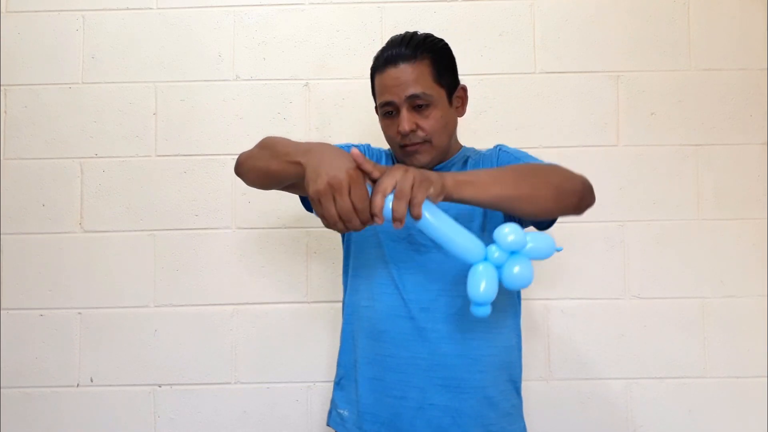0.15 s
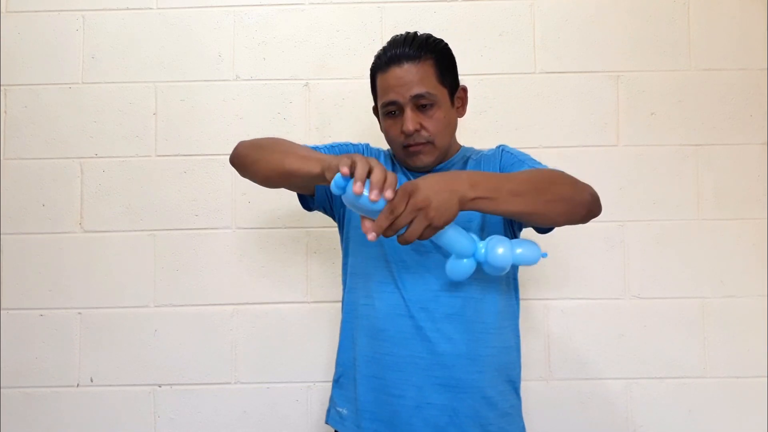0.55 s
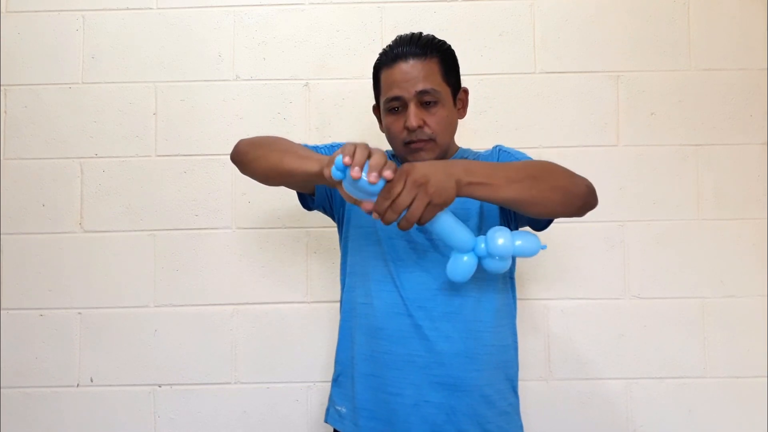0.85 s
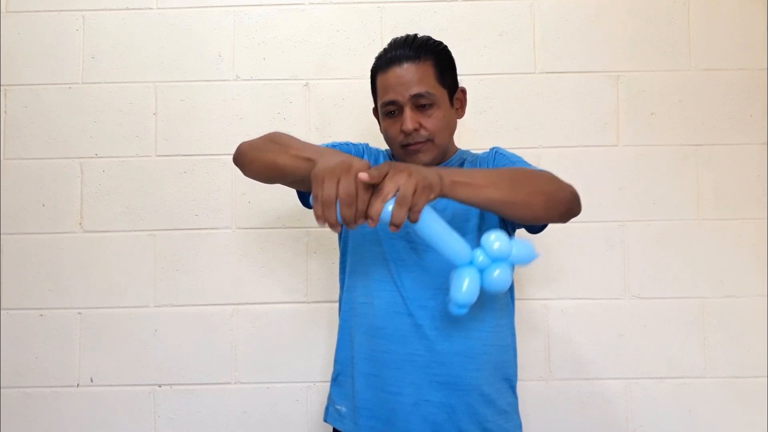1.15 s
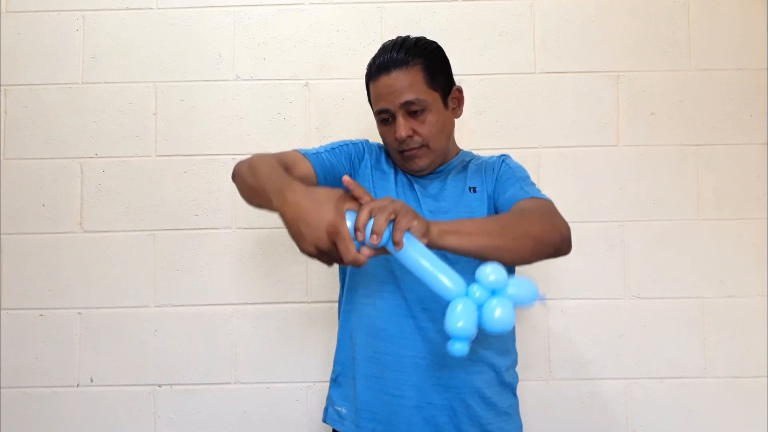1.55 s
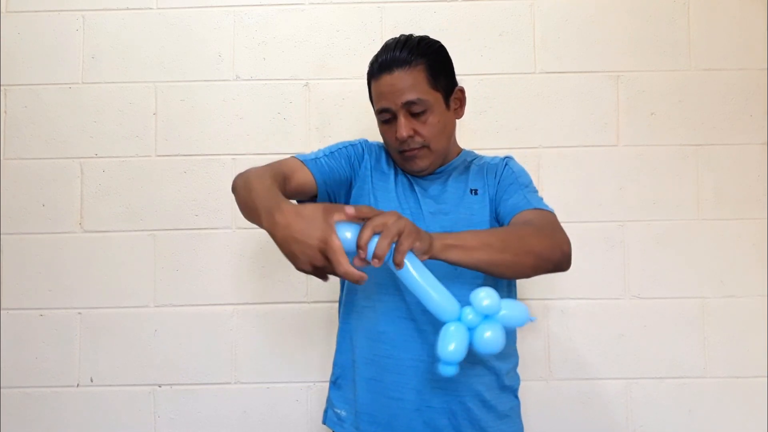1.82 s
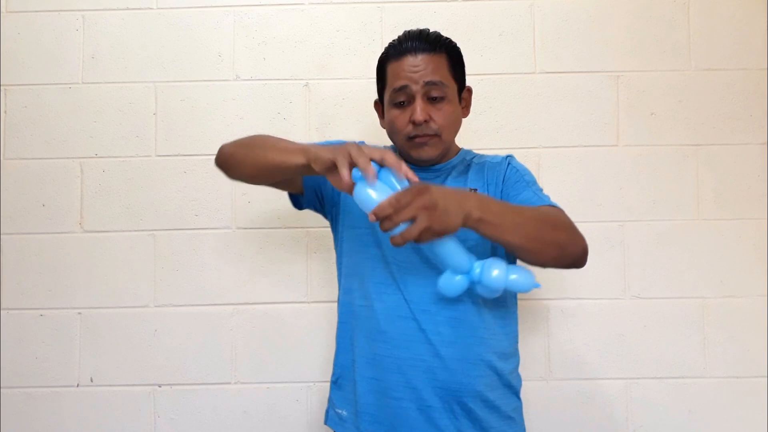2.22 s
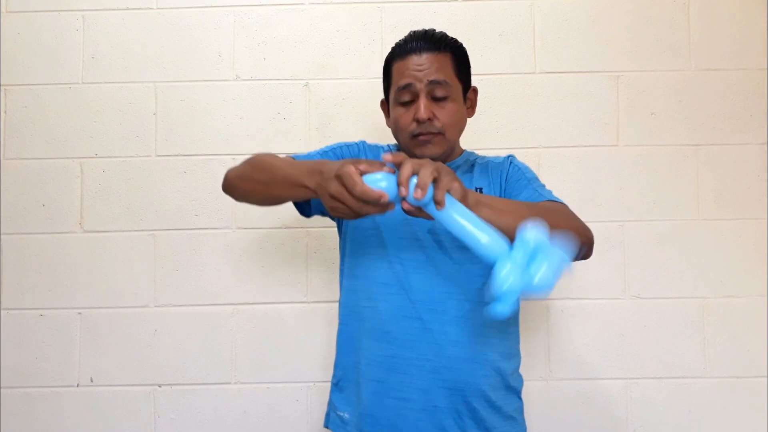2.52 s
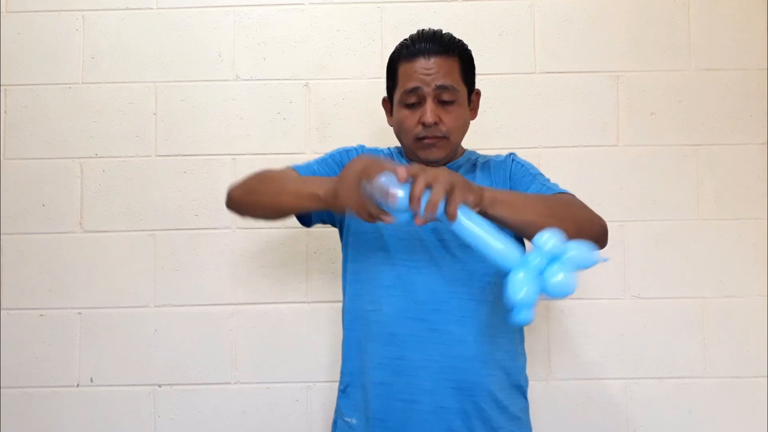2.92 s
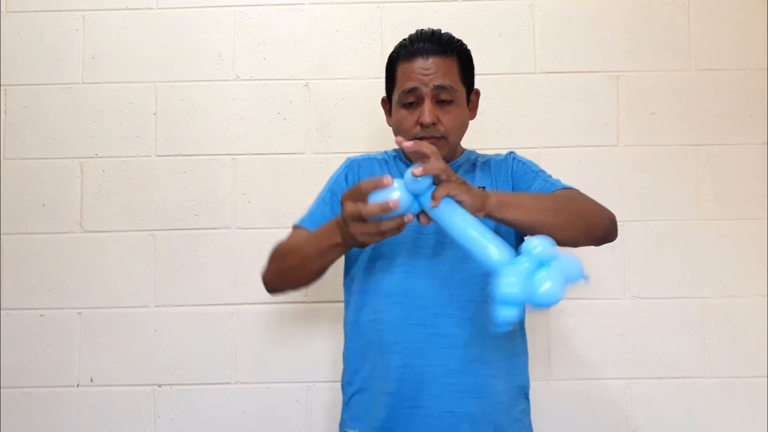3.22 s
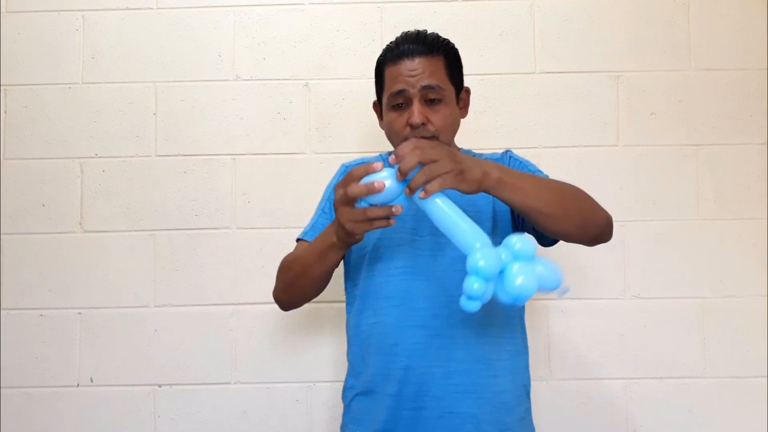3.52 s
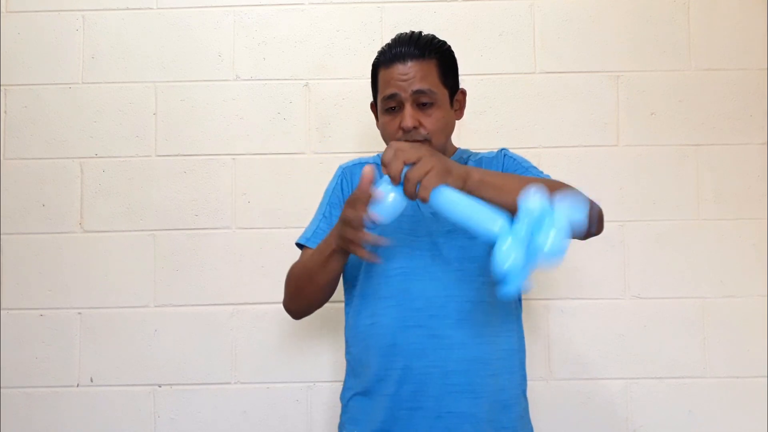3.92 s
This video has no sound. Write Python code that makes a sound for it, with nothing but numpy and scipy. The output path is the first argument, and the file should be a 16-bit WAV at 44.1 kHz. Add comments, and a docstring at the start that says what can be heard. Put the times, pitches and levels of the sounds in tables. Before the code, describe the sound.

A long latex balloon is twisted by hand, heard from a few steps away in a small, hard-walled room. Each burst is very brief, bright and slightly hollow, with a short echo. From the start to about 1.4 seconds come light, irregular creaks and ticks, with a tiny groan at 0.5 and faint chirps near 1.0. A stronger rub hits at 1.5. A loud snap and creaks at 1.8 lead to a short high squeal at 1.9, then a lull. Small snaps and rubs resume around 2.3, growing to a firm creak near 2.9. A sharp, loud snap lands at 3.1 and a short lower squeak at 3.3. More creaks follow around 3.6, thinning to a soft chirp and light ticks by 4 seconds. Faint rubbery crackling fills some gaps, over very quiet, dull, steady room noise.

```python
"""In a small, bare room with hard walls, someone twists and locks a long latex balloon by hand.
The rubber sticks, then slips: one slip snaps, a run of slips creaks and rubs, and now and then
the slips fall into step and squeak. Snaps and rubs ring the tight skin and the air in the
balloon's bubbles. The room draws each burst out, over a faint, dull background noise."""
import sys
import numpy as np
from scipy import signal
from scipy.fft import rfft, irfft
from scipy.io import wavfile
from scipy.ndimage import uniform_filter1d

SR = 44100
rng = np.random.default_rng(int(sys.argv[2]) if len(sys.argv) > 2 else 0)


def master_out(mix):
    """Clip the mix to full scale and print it as 16-bit PCM to the path in sys.argv[1]."""
    frames = np.transpose(np.atleast_2d(mix))
    ceiling = np.clip(frames, -1, 1)
    pcm = np.round(ceiling * 32767).astype(np.int16)
    wavfile.write(sys.argv[1], SR, pcm)


N = 179310


def from_db(db):
    """Turn decibels into a number to multiply by."""
    return 10 ** (np.asarray(db) / 20)


def unit_energy(x):
    """Scale a sound so that its squares add up to one."""
    return x / np.sqrt(np.sum(x ** 2) + 1e-20)


def at_hz(points, hz):
    """Read between the rows of a table, giving every octave equal space."""
    known_hz, values = np.transpose(points)
    return np.interp(np.log(np.maximum(hz, 1)), np.log(known_hz), values)


def add(out, start_s, sound):
    """Mix a sound in at its start time."""
    start = int(np.clip(start_s * SR, 0, N - 1))
    out[start:start + len(sound)] += sound[:N - start]


# The background noise, from bass to treble: frequency_hz, relative_level_db
BACKGROUND_SPECTRUM = [(20, -2), (45, -22.5), (72, 3), (100, -2), (220, -4), (450, -7.5), (650, -6),
                       (1300, -13), (3000, -20), (6000, -27), (16000, -38)]

def background(level_db=-63):
    """Faint, dull, steady room noise."""
    gain = from_db(at_hz(BACKGROUND_SPECTRUM, np.fft.rfftfreq(N, 1 / SR)))
    noise = irfft(rfft(rng.standard_normal(N)) * gain, N)
    return from_db(level_db) * unit_energy(noise) * np.sqrt(N)


# How long the room takes to die away by 60 dB: frequency_hz, fade_s
ROOM_FADE_TIMES = [(150, 0.23), (500, 0.29), (1400, 0.2898), (3500, 0.3), (8000, 0.212), (15000, 0.17)]
# The first bounces off the walls: delay_s, gain (the direct sound is 1)
WALL_ECHOES = [(.0034, 0.44), (.0084, 0.85)]

def room_response(tail_db=4.5, build_s=0.0057):
    """One click in the room: the direct sound, two echoes and a tail whose highest notes die first."""
    t = np.arange(int(.5 * SR)) / SR
    hz, white = np.fft.rfftfreq(len(t), 1 / SR), rfft(rng.standard_normal(len(t)))
    edges_hz = np.geomspace(40, SR / 2, 16)
    tail, build = np.zeros(len(t)), 1 - np.exp(-t / build_s)
    for low, high in zip(edges_hz, edges_hz[1:]):
        band = irfft(white * ((hz >= low) & (hz < high)), len(t))
        fade = np.exp(-np.log(1000) * t / at_hz(ROOM_FADE_TIMES, np.sqrt(low * high)))
        tail += unit_energy(band * fade * build) * np.sqrt(high - low)
    response = from_db(tail_db) * unit_energy(tail)
    response[0] += 1   # the direct sound
    for delay_s, gain in WALL_ECHOES:
        response[int(delay_s * rng.uniform(.9, 1.1) * SR)] += gain
    return unit_energy(response)


def room(x, stretches=90):
    """The balloon keeps moving, so each stretch of its sound gets a new pattern of echoes."""
    out, marks = np.zeros(N), np.linspace(0, N, stretches + 1).astype(int)
    overlap = int(.004 * SR)
    for start, end in zip(marks, marks[1:]):
        stretch = x[start:end + overlap]
        steps = np.arange(len(stretch))
        fade = np.minimum(np.minimum(steps, len(stretch) - steps) / overlap, 1)
        add(out, start / SR, signal.fftconvolve(stretch * fade, room_response()))
    return out


def flutter(slips, decay_s, jolt_db):
    """Each slip is a jolt, then a scatter of waves that run round the balloon for a moment."""
    power = signal.lfilter([1], [1, -np.exp(-2 / (decay_s * SR))], slips ** 2)
    scatter = unit_energy(np.sqrt(power) * rng.standard_normal(len(slips)))
    return scatter + from_db(jolt_db) * unit_energy(slips)


def resonate(x, hz, width_hz):
    """Ring around one pitch; filtering twice shuts out far-off pitches more firmly."""
    half_width = np.tan(np.pi * min(width_hz / SR, .4))
    section = [half_width, 0, -half_width, 1 + half_width, -2 * np.cos(2 * np.pi * hz / SR), 1 - half_width]
    return signal.sosfilt(np.array([section, section]) / (1 + half_width), x + 1e-18)


RING_SAMPLES = 2048   # time allowed for a slip to ring out
SKIN_HZ = 2012   # the skin's ring at a typical tightness

# The crack, from bass to treble: frequency_hz, relative_level_db
CRACK_SPECTRUM = [(100, -69), (1500, -20), (3000, 4.5), (4500, 5), (6000, 2.5), (8000, 3.5), (9500, -1.5),
                  (11000, -10), (16000, -6)]

def crack_pulse():
    """Rubber letting go: the shortest click that has this mix of bass and treble."""
    gain = from_db(at_hz(CRACK_SPECTRUM, np.fft.rfftfreq(RING_SAMPLES, 1 / SR)))
    # pack the energy at the very start of the click (minimum phase)
    cepstrum = irfft(np.log(gain))
    cepstrum[1:RING_SAMPLES // 2] *= 2
    cepstrum[RING_SAMPLES // 2 + 1:] = 0
    return unit_energy(irfft(np.exp(rfft(cepstrum))))


# Each new grip holds a bubble of another size: start_s, bubble_hz, bubble_db (compared with the skin)
HAND_GRIPS = [(0.0, 696, -18.5), (0.27, 890, -5), (0.57, 610, -3.5), (0.85, 1260, -37), (1.14, 691, -12.5),
              (1.23, 1613, -6), (1.47, 830, -9.5), (2.22, 560, -8), (2.32, 1264, -11), (2.54, 640, -2),
              (2.76, 997, -4), (3.38, 610, 0), (3.54, 880, -7), (3.75, 600, -1)]

def slip_sound(slips, start_s, ring_hz, crack_db, sharp_db=0):
    """Slips crack and ring the skin (higher when tighter) and the held bubble (pitched by its size)."""
    _, bubble_hz, bubble_db = HAND_GRIPS[sum(start_s >= grip[0] for grip in HAND_GRIPS[1:])]
    width_hz = 1880 * (ring_hz / SKIN_HZ) ** 0.43   # tighter skin rings over a wider band
    slips = np.pad(slips, (0, RING_SAMPLES))
    skin_shake = flutter(slips, decay_s=0.0033, jolt_db=sharp_db - 3.0)
    bubble_shake = flutter(slips, decay_s=0.0023, jolt_db=sharp_db + 2.5)
    crack_shake = flutter(slips, decay_s=0.00218, jolt_db=sharp_db - 15.5)
    skin = unit_energy(resonate(skin_shake, ring_hz, width_hz))
    bubble = unit_energy(resonate(bubble_shake, bubble_hz, width_hz=0.92 * bubble_hz))
    crack = unit_energy(signal.fftconvolve(crack_shake, crack_pulse())[:len(slips)])
    return np.linalg.norm(slips) * (skin + from_db(bubble_db) * bubble + from_db(crack_db) * crack)


# Times when both hands hold the twist: start_s, end_s, level_db
HELD_TWISTS = [(0.049, 0.79, -59), (1.026, 1.756, -53.5), (2.299, 2.668, -48.5), (2.93, 3.9, -53)]

def creep(slips_per_s=310, uneven_db=5.0):
    """Held rubber creeps faintly, in tiny slips of uneven size at random moments."""
    out = np.zeros(N)
    for start_s, end_s, level_db in HELD_TWISTS:
        size = int((end_s - start_s) * SR)
        slips = (rng.random(N) < slips_per_s / SR) * from_db(uneven_db * rng.standard_normal(N))
        slips = unit_energy(slips[:size]) * np.sqrt(size)
        add(out, start_s, from_db(level_db) * slip_sound(slips, start_s, ring_hz=1420, crack_db=-5.5))
    return out


# The tones in each kind of squeak (high squeal, low squeak, groan of the twisted neck, thin chirp):
# pitch_multiple, relative_level_db
SQUEAK_TONES = {"high": [(1, -0.5), (2, 8), (3, 0.5), (4, 4.5), (5, 0), (6, -8.5), (7, -16), (8, -21),
                (9, -28)], "low": [(1, 3.5), (2, -0.5), (3, -7.5), (4, -14.5), (5, -12.5), (6, -17.5),
                (7, -18), (8, -20), (9, -23), (10, -29), (11, -25.5)], "groan": [(1, -3), (2, 0), (3, 5),
                (4, -9), (5, -5)], "chirp": [(1, 5), (2, -24)]}
# The squeaks: start_s, length_s, pitch_hz, glide_octaves_per_s, level_db, waver (share of pitch), kind
SQUEAK_EVENTS = [(0.508, 0.031, 384.9, -2, -28.5, 0.032, "groan"),
                 (0.955, 0.047, 1394, 9.5, -45.5, 0.02, "chirp"),
                 (0.981, 0.024, 1912, -6, -39, 0.1, "chirp"),
                 (1.909, 0.038, 1573, 0.23, -22, 0.021, "high"),
                 (3.270, 0.033, 893, -3.5, -21, 0.0116, "low"),
                 (3.310, 0.023, 843, -2, -37.5, 0.0075, "low"),
                 (3.784, 0.032, 467, -2.5, -36.5, 0.05, "chirp")]

def squeaks(attack_s=0.0057, release_s=0.02, waver_cycles=3.2):
    """Slips lock into a tone whose pitch slides with the tension and trembles with the grip."""
    out = np.zeros(N)
    for start_s, length_s, pitch_hz, glide, level_db, waver, kind in SQUEAK_EVENTS:
        t = np.arange(int(length_s * SR)) / SR
        smoothing = max(int(waver_cycles / pitch_hz * SR), 1)
        tremble = unit_energy(uniform_filter1d(rng.standard_normal(N), smoothing)) * np.sqrt(N)
        hz = pitch_hz * 2 ** (glide * t) * (1 + waver * tremble[:len(t)])
        phase = 2 * np.pi * np.cumsum(hz) / SR
        gains = np.sqrt(2) * unit_energy(from_db(np.array(SQUEAK_TONES[kind])[:, 1]))
        tone = sum(gain * np.sin(multiple * phase) for multiple, gain in enumerate(gains, 1))
        fade = np.clip(np.minimum(t / attack_s, (length_s - t) / release_s), 0, 1)
        add(out, start_s, from_db(level_db) * fade * tone)
    return out


def slip_run(length_s, slips_per_s, jitter=.2, uneven_db=2.5, drift=0.27, fade_share=0.28):
    """Tension builds and lets go almost regularly, speeding up or slowing with the hand."""
    timing, strengths, trend = rng.standard_normal((3, 128))
    size = max(int(length_s * SR), 2)
    progress = np.minimum(np.arange(len(timing)) / (length_s * slips_per_s), 1) - .5
    gaps_s = np.exp(jitter * timing + drift * trend[0] * progress) / slips_per_s
    at = ((np.cumsum(gaps_s) - gaps_s[0] / 2) * SR).astype(int)
    slips = np.zeros(size)
    slips[at[at < size]] = from_db(uneven_db * strengths[at < size])
    return unit_energy(slips * signal.windows.tukey(size, fade_share)) * np.sqrt(size)


# Runs of slips: start_s, length_s, level_db, ring_hz, crack_db (compared with the skin)
RUB_STROKES = [(0.0, 0.0212, -37.5, 2180, -6.5), (0.277, 0.032, -36.5, 1683, -10.5),
               (0.343, 0.049, -32, 1909, -11), (0.399, 0.13, -40.5, 1483, -28.5),
               (0.591, 0.042, -34.5, 1580, -3), (0.886, 0.023, -35.5, 2054, -17),
               (0.902, 0.027, -33, 2710, -9), (0.968, 0.0636, -45.5, 1737, -13.5),
               (1.148, 0.019, -35, 3626, -1), (1.241, 0.051, -36.5, 2322, -9.5),
               (1.389, 0.023, -36, 3255, -2.5), (1.409, 0.024, -31, 2784, 1),
               (1.486, 0.016, -25.5, 1492, -19), (1.497, 0.018, -21.5, 2700, -2),
               (1.787, 0.027, -24, 2390, -14), (1.827, 0.026, -34, 2219, -0.5),
               (1.872, 0.025, -25.5, 1782, -33.5), (1.907, 0.022, -28, 3290, -1),
               (2.46, 0.079, -49, 1222, -8), (2.558, 0.049, -30, 1308, -12.5),
               (2.771, 0.05, -44.5, 1817, -5), (2.846, 0.0195, -32.5, 1240, -16),
               (2.861, 0.048, -25.5, 1367, -14.5), (3.035, 0.0384, -44, 1860, -3.5),
               (3.107, 0.019, -25, 2470, -17.5), (3.123, 0.038, -34, 1680, -26),
               (3.277, 0.02104, -30.5, 889.7, -28), (3.387, 0.0313, -38, 900, -6),
               (3.55, 0.053, -30.5, 1714, -1), (3.609, 0.03045, -28.5, 2410, -2.5),
               (3.642, 0.06, -45, 1880, -3.5), (3.769, 0.042, -34, 1046, -33)]

def rubs(typical_s=0.03, typical_slips_per_s=310):
    """A stroke creaks with a run of slips; shorter strokes and tighter skin slip faster."""
    out = np.zeros(N)
    for start_s, length_s, level_db, ring_hz, crack_db in RUB_STROKES:
        slips_per_s = typical_slips_per_s * (typical_s / length_s) ** 0.46 * (ring_hz / SKIN_HZ) ** 0.5
        slips = slip_run(length_s, slips_per_s)
        add(out, start_s, from_db(level_db) * slip_sound(slips, start_s, ring_hz, crack_db))
    return out


# Single slips: start_s, strength_db, ring_hz, crack_db (compared with the skin)
SINGLE_SLIPS = [(0.043, -7, 2900, -4.5), (0.123, -6, 2230, -9.5), (0.235, -13.5, 1800, -4),
                (0.525, -6, 2260, -6), (0.581, -18.5, 1570, 7), (0.627, 5, 1220, -10),
                (0.645, -4.5, 1950, 0), (0.863, -17.5, 1296, -29.5), (1.151, -5, 3270, -0.5),
                (1.252, -15.5, 2600, 4.5), (1.658, -17.5, 2830, 6.5), (1.77, -20.5, 1400, 4),
                (1.786, 14, 1286, -8), (2.236, -16, 930, -15), (2.289, -9, 1615, -16),
                (2.335, -6, 2030, 0.5), (2.414, 3, 890, -6.5), (2.422, 5.5, 2593, -18),
                (2.578, 3.5, 1800, -3), (2.837, -9, 970, -7), (2.877, 9, 930, -9), (2.881, -7, 2400, -13),
                (3.084, 4, 1130, -36), (3.111, 16.5, 1990, -12.5), (3.156, 8, 1445, -16),
                (3.247, -6, 1560, -9), (3.407, 0, 2280, -12.5), (3.615, 5.5, 1620, -8),
                (3.846, -7.5, 1840, -8.5), (3.909, -9, 2200, -6.5), (3.936, -6.5, 587, -12.5)]

def snaps():
    """A lone slip snaps, jolting the skin more sharply than the slips of a run."""
    out = np.zeros(N)
    for start_s, strength_db, ring_hz, crack_db in SINGLE_SLIPS:
        snap = slip_sound(np.ones(1), start_s, ring_hz, crack_db, sharp_db=4)
        add(out, start_s, from_db(strength_db) * snap)
    return out


def scene(low_cut_hz=170):
    """The balloon a few steps away in the room; its small bubbles give off little bass."""
    bass_cut = signal.butter(2, low_cut_hz, "high", fs=SR, output="sos")
    slipping = snaps() + rubs() + creep()
    balloon = signal.sosfilt(bass_cut, slipping + 1e-18) + squeaks()
    return (room(balloon) + background())[None]


def record(dry, cutoff_hz=15800):
    """Round off the loudest peaks and cut away the very highest treble."""
    rounded = .9 * np.tanh(dry / .9)
    return signal.sosfilt(signal.ellip(10, .1, 80, cutoff_hz, fs=SR, output="sos"), rounded)


dry = scene()
out = record(dry)
master_out(out)
```